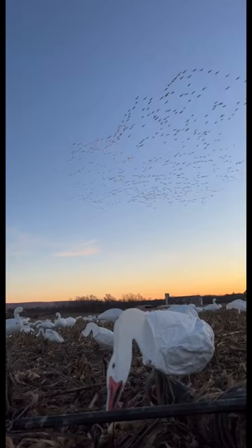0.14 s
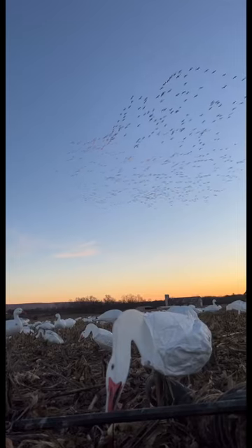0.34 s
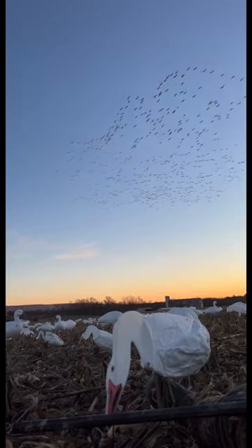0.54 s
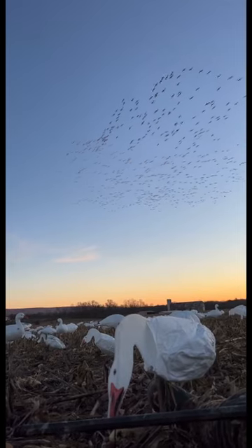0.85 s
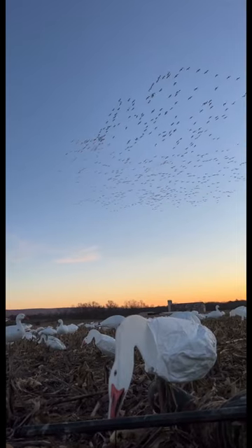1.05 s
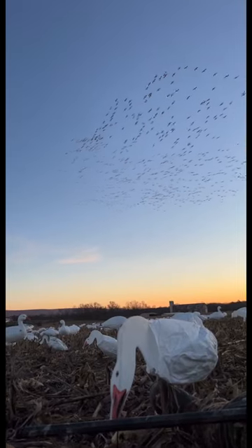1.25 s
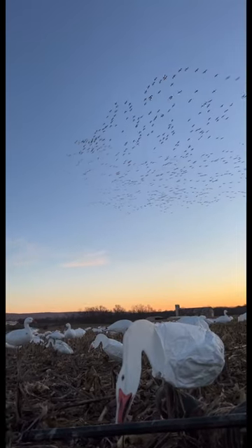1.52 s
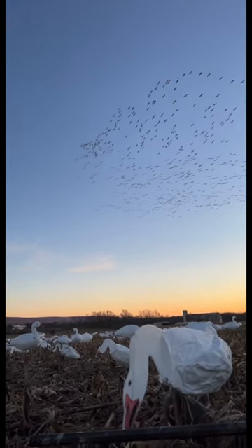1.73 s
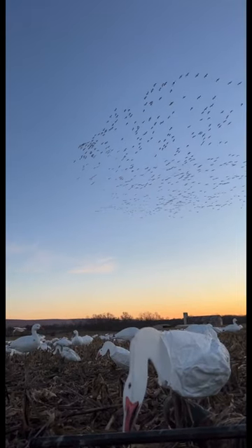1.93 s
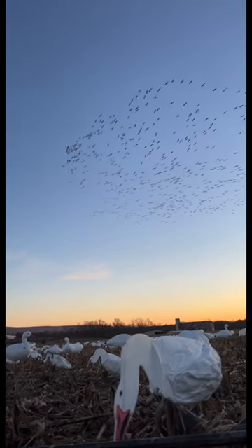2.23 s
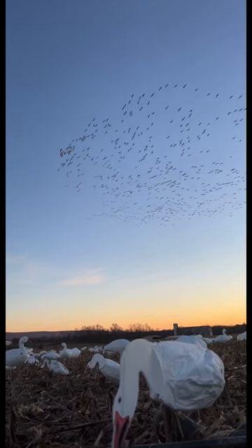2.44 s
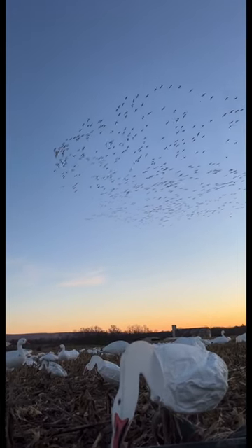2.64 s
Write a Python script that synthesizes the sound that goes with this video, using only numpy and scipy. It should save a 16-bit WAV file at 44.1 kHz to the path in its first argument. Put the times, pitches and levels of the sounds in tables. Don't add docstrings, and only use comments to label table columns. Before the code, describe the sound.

After a tiny silence, a big flock of geese clamours continuously to the end, about 2.8 seconds. Short, raspy, arching honks overlap with dull distant hoots and a blurred crowd. Low grunts thicken between 0.9 and 2 seconds; the clamour surges brightest around 1.6 and 1.9. Wind rumbles low, with soft thumps near 0.3 and 0.8 and a stronger gust near 1.95. Open field, faint echoes.

```python
import sys
import numpy as np
from scipy import signal
from scipy.fft import rfft, irfft
from scipy.io import wavfile
from scipy.ndimage import uniform_filter1d

SR = 44100
rng = np.random.default_rng(int(sys.argv[2]) if len(sys.argv) > 2 else 0)


def wav_out(sig):
    wavfile.write(sys.argv[1], SR, np.round(np.clip(np.atleast_2d(sig).T, -1, 1) * 32767).astype(np.int16))


def invert_db(x):
    u = np.asarray(x, float) / 20
    return 10 ** u


N = 122598

# (rise, fall: share of pitch lost 0.05 s from the crest; level of half-pitch lines, dB)
ARCHED_BEND, LEVEL_BEND, HALVED_BEND = (.075, .07, -28), (.022, .022, -28), (.022, .03, -4)
# frequency_hz, line_level_db
HONK_THROAT = [(850, 2), (1750, -4), (2400, 4), (2850, 5), (3500, -6), (5500, -5), (7500, -1),
               (15500, -28.5)]
# frequency_hz, line_level_db
DULL_THROAT = [(600, -19), (1000, 2), (2000, 8), (3000, -14), (4200, -4), (6000, -54), (15500, -54)]
RASP_DB, AWAY_RASP_DB = -11, -3


def rms_one(x):
    return x / np.sqrt(np.mean(x ** 2) + 1e-20)


def in_time(rows):
    return np.interp(np.arange(N) / SR, *np.transpose(rows))


def at_hz(points, hz):
    points = np.array(points)
    return np.interp(np.log(hz), np.log(points[:, 0]), points[:, 1])


def filtered(x, order, hz, kind):
    return signal.sosfilt(signal.butter(order, hz, kind, fs=SR, output="sos"), x)


def drift(rate_hz, size):
    r = np.exp(-2 * np.pi * rate_hz / SR)
    noise = rng.standard_normal(max(size, 8192) + 4096)
    slow = rms_one(signal.lfilter([1], [1, -2 * r, r * r], noise)[4096:])
    return slow[:size]


def coloured(x, spectrum):
    hz = np.maximum(np.arange(N // 2 + 1) * SR / N, 1)
    return irfft(rfft(x) * invert_db(at_hz(spectrum, hz)), N)


def gusts():
    # time_s, level_db
    strength = [(0.04, -48), (0.43, -36), (0.45, -41.5), (0.59, -35), (0.72, -47), (0.79, -36.5),
                (1.41, -43), (1.46, -32.5), (1.77, -41), (1.95, -26.5), (1.97, -34.5), (2.05, -29.5),
                (2.09, -39), (2.23, -31.5), (2.34, -43), (2.59, -40.5), (2.6, -33), (2.78, -33.5)]
    # frequency_hz, level_db per Hz
    turbulence = [(13, -4), (22, -17.5), (47, 1), (69, 2), (107, -9), (226, -24), (373, -35), (560, -72),
                  (730, -97), (1230, -120)]
    lumps = rng.standard_normal(N) * invert_db(2 * drift(11.3, N))
    low = coloured(lumps, [(5.9, -68), *turbulence, (900, -65)])
    return invert_db(in_time(strength)) * rms_one(low)


def puffs():
    # start_s, peak_db
    buffets = [(0.198, -32), (0.298, -28.5), (0.552, -36), (0.826, -23), (0.977, -39), (1.158, -35.5),
               (1.239, -46), (1.442, -44), (1.643, -41), (1.84, -43), (2.124, -32), (2.581, -33)]
    width_s, low_hz, trim_db = 0.016, 99, -7.5
    t = np.arange(N) / SR
    swell = np.zeros(N)
    for start, db in buffets:
        swell += invert_db(db + trim_db) * np.exp(-((t - start - width_s) / width_s) ** 2)
    return swell * rms_one(filtered(rng.standard_normal(N), 2, [low_hz / 1.025, low_hz * 1.41], "band"))


def wind():
    air = filtered(rng.standard_normal(N), 2, [200, 700], "band")
    return gusts() + puffs() + invert_db(-60.5) * rms_one(air)


def call(out, start, crest, end, pitch_hz, level_db, bend, throat, rasp_db=RASP_DB):
    bend_s, bend_power, attack_s, release_s = .05, 1.6, .018, .028
    jitter, jitter_hz, line_scatter_db = .002, 150, 1.0
    flicker_db, flicker_full_hz, flicker_s = 6.5, 5500, .018
    block = 64

    first = int(start * SR)
    t = np.arange(first, min(int(end * SR), N)) / SR
    rise, fall, half_db = bend
    loss = np.where(t < crest, rise, fall) * (abs(t - crest) / bend_s) ** bend_power
    arch = 1 - np.minimum(loss, .3)
    scatter = rng.standard_normal(128)
    noise = rng.standard_normal(8192)[:len(t)]

    hz = pitch_hz / 2 * arch * (1 + jitter * drift(jitter_hz, len(t)))
    k = np.arange(1, min(int(2 * 15500 / pitch_hz), 38))[:, None]
    if half_db < -20:
        k = k[1::2]

    size = int(flicker_s * SR / block)
    flicker = uniform_filter1d(rng.standard_normal((38, 160)), size, axis=1)
    flicker = rms_one(uniform_filter1d(flicker, size, axis=1))
    gain_db = at_hz(throat, k * hz[::block]) + half_db * (k % 2) + line_scatter_db * scatter[k]
    depth_db = flicker_db * np.minimum(k * pitch_hz / 2 / flicker_full_hz, 1) ** 2
    gain = invert_db(gain_db + depth_db * flicker[:len(k), :gain_db.shape[1]])
    gain = np.repeat(gain, block, axis=1)[:, :len(t)]

    turn = 2 * np.pi * np.cumsum(hz) / SR
    voice = rms_one((gain * np.sin(k * turn + scatter[k + 64])).sum(0))
    voice = voice * (1 + invert_db(rasp_db) * rms_one(uniform_filter1d(noise, size=40)))
    attack = np.clip((t - start) / attack_s, 0, 1)
    release = np.clip((end - t) / release_s, 0, 1)
    out[first:first + len(t)] += invert_db(level_db) * np.sin(np.pi / 2 * attack * release) * voice


def crowd(blur_db, count):
    # frequency_hz, line_level_db
    crowd_throat = [(850, 5), (1700, -1.5), (2500, -6), (3350, -14), (4100, -1.5), (5800, -9), (7500, 5),
                    (15500, -20.5)]
    # frequency_hz, level_db per Hz
    blur_colour = [(600, -7.5), (850, 5), (1700, -6), (2500, -6), (4000, -8.5), (5800, -14.5),
                   (7700, -15.5), (15500, -35)]
    pitch_hz, pitch_spread, call_s, scatter_db = 794.3, .12, .075, 5
    bends = (ARCHED_BEND, LEVEL_BEND, HALVED_BEND)
    out = np.zeros(N)
    for j, (when, size, lean, tune, loud) in enumerate(rng.standard_normal((count, 5))):
        start = max((j + when) / count * N / SR - call_s / 2, 0)
        length = call_s * np.exp(np.clip(.3 * size, -.5, .45))
        if start < N / SR - .02:
            crest = start + length * (.55 + .15 * lean)
            hz = pitch_hz * np.exp(pitch_spread * max(tune, -1))
            call(out, start, crest, start + length, hz, scatter_db * loud, bends[j % 3], crowd_throat)
    blur = rms_one(coloured(rng.standard_normal(N), blur_colour))
    return rms_one(rms_one(out) + invert_db(blur_db) * blur)


def near_crowd(eagerness_db):
    near = crowd(blur_db=-3, count=110)
    treble = filtered(near, 4, [3000, 10000], "band").std()
    return near / treble * invert_db(eagerness_db - 0.5)


def far_crowd(excess_db):
    far = filtered(crowd(blur_db=-8, count=100), 2, 1650, "low")
    return invert_db(-43.5 + 0.21 * excess_db) * rms_one(far)


def grunts(out):
    # start_s, length_s, pitch_hz, level_db
    low_calls = [(0.048, 0.055, 247, -45), (0.163, 0.066, 270, -56), (0.547, 0.083, 346, -46.5),
                 (0.612, 0.042, 329.3, -45), (0.916, 0.057, 245.7, -36), (1.044, 0.041, 334.4, -38),
                 (1.113, 0.11, 327, -43.5), (1.191, 0.053, 248.4, -33.5), (1.303, 0.055, 346.3, -41),
                 (1.414, 0.076, 345.3, -44), (1.561, 0.047, 249.5, -38), (1.608, 0.061, 342.8, -35),
                 (1.719, 0.056, 334, -33), (1.723, 0.0676, 244.4, -38.5), (1.773, 0.079, 266.6, -45.5),
                 (1.898, 0.1, 398, -56), (1.85, 0.062, 340, -38), (1.949, 0.064, 349, -40.5),
                 (2.082, 0.065, 342.5, -40.5), (2.183, 0.082, 321, -42.5), (2.25, 0.036, 278, -37)]
    # frequency_hz, line_level_db
    grunt_throat = [(500, -14), (700, -5), (1000, 0), (1280, 2), (1480, -7), (1750, -22), (3000, -32),
                    (8000, -46)]
    for start, length, hz, db in low_calls:
        crest, end = start + length * 0.552, start + length
        call(out, start, crest, end, hz, db, (.05, .04, -10), grunt_throat, rasp_db=-12)


def hoots(out):
    # start_s, crest_s, end_s, pitch_hz
    hoot_calls = [(.05, .085, .11, 990), (.05, .08, .12, 770), (.15, .165, .24, 860), (.21, .34, .39, 1190),
                  (.395, .42, .445, 1200), (.38, .43, .45, 970), (.55, .61, .70, 850),
                  (.61, .67, .71, 1350), (.74, .75, .84, 1230), (.79, .88, .95, 750), (.96, 1.0, 1.04, 830),
                  (1.045, 1.09, 1.12, 690), (1.10, 1.15, 1.18, 1310), (1.20, 1.23, 1.27, 760),
                  (1.30, 1.34, 1.38, 725), (1.67, 1.75, 1.79, 705), (1.79, 1.85, 1.90, 700),
                  (1.88, 1.95, 2.03, 805), (1.895, 1.92, 1.95, 1150), (2.09, 2.12, 2.16, 985),
                  (2.17, 2.225, 2.25, 1315), (2.29, 2.345, 2.375, 1585), (2.29, 2.32, 2.41, 810),
                  (2.60, 2.66, 2.72, 815), (1.42, 1.47, 1.53, 705)]
    hoot_levels = [-57, -53, -53, -48, -45, -44, -46, -46, -45.5, -46, -43.5, -51, -56, -60, -40, -51,
                   -45.5, -44.5, -40, -53, -50.5, -45, -49, -43.5, -42]
    multiples = np.array([(1, 0), (2, -13), (3, -18), (8, -36)])  # (multiple of the pitch, dB per line)
    for row, db in zip(hoot_calls, hoot_levels):
        call(out, *row, db, (.02, .028, -28), multiples * np.array([row[3], 1]))


def level_honks(out):
    # start_s, crest_s, end_s, pitch_hz
    held_calls = [(.06, .12, .13, 802), (.50, .535, .55, 1203), (.84, .87, .89, 760),
                  (.955, .99, 1.02, 812), (1.55, 1.605, 1.63, 858), (1.63, 1.61, 1.72, 812),
                  (1.92, 1.97, 2.02, 815), (2.52, 2.53, 2.56, 800), (.74, .77, .83, 842),
                  (.925, .95, .975, 800), (1.88, 1.94, 1.97, 813)]
    held_levels = [-45.5, -48.5, -55, -48.5, -34.5, -42.5, -66, -50, -55, -46.5, -43]
    for row, db in zip(held_calls, held_levels):
        call(out, *row, db, LEVEL_BEND, HONK_THROAT)


def arched_honks(out):
    # start_s, crest_s, end_s, pitch_hz
    arched_calls = [(.14, .17, .21, 852), (.23, .31, .37, 912), (.65, .715, .79, 925),
                    (1.11, 1.10, 1.18, 775), (1.50, 1.585, 1.555, 825), (1.84, 1.92, 1.95, 852),
                    (1.94, 1.975, 2.02, 845), (2.075, 2.105, 2.18, 786), (2.52, 2.578, 2.63, 930),
                    (2.66, 2.715, 2.77, 910), (2.45, 2.515, 2.52, 835), (2.615, 2.665, 2.69, 811),
                    (2.26, 2.31, 2.33, 896)]
    arched_levels = [-47.5, -43.5, -39, -43.5, -37.5, -47.5, -60, -49, -38, -45, -44.5, -38, -45.5]
    for row, db in zip(arched_calls, arched_levels):
        call(out, *row, db, ARCHED_BEND, HONK_THROAT)
    call(out, 1.345, 1.405, 1.465, 842, -37, (.033, .125, -28), HONK_THROAT)


def distant_dull_honks(out):
    # start_s, crest_s, end_s, pitch_hz
    away_calls = [(2.655, 2.70, 2.73, 1000), (2.12, 2.18, 2.22, 985), (2.31, 2.39, 2.44, 1095),
                  (2.31, 2.34, 2.45, 1010), (2.11, 2.15, 2.17, 1085), (.94, 1.0, 1.02, 1630),
                  (.95, .97, .99, 1480), (1.07, 1.12, 1.13, 760), (2.33, 2.40, 2.47, 1045),
                  (2.13, 2.20, 2.235, 925), (.18, .235, .27, 1105)]
    away_levels = [-41, -48.5, -49, -47.5, -50.5, -44.5, -46.5, -45.5, -50.5, -49, -49.5]
    for row, db in zip(away_calls, away_levels):
        call(out, *row, db, LEVEL_BEND, DULL_THROAT, AWAY_RASP_DB)
    call(out, .365, .42, .47, 975, -50, (.16, .2, -28), DULL_THROAT, AWAY_RASP_DB)


def halved_honks(out):
    # start_s, crest_s, end_s, pitch_hz
    halved_calls = [
        (.30, .37, .40, 790),
        (.84, .895, .915, 818),
        (1.07, 1.12, 1.14, 814),
        (1.26, 1.28, 1.32, 774),
        (2.28, 2.35, 2.37, 796),
    ]
    halved_levels = [-41, -40.5, -51, -45, -44]
    for row, db in zip(halved_calls, halved_levels):
        call(out, *row, db, HALVED_BEND, HONK_THROAT)


def nasal_cackle(out):
    # frequency_hz, line_level_db
    nasal_throat = [(800, -7), (3100, -17), (3750, -0.5), (4250, -6), (4700, -12), (8000, -17),
                    (15500, -36)]
    call(out, 1.89, 1.982, 2.025, 843, -45, (.036, .125, -1), nasal_throat)


def shared_colour(birds):
    # frequency_hz, gain_db
    path_response = [(2850, 0.5), (3060, -4), (3400, 3), (9000, -8), (10300, -15), (11600, -22.5),
                     (13300, -11.5), (15600, -3)]
    wet = birds.copy()
    for delay_s, db in ((.023, -17.5), (0.06, -22)):
        delay = int(delay_s * SR)
        wet[delay:] += invert_db(db) * birds[:N - delay]
    return filtered(coloured(wet, path_response), 8, 568, "high")


def flock():
    # time_s, level_db
    eagerness = [(.04, -51.5), (.1, -40), (.43, -43), (.5, -51.5), (.58, -40.5), (.77, -39.5), (.83, -49),
                 (.96, -43), (1.09, -50.5), (1.15, -41.5), (1.47, -49), (1.58, -34), (1.68, -37),
                 (1.78, -58.5), (1.88, -36), (1.98, -46.5), (2.07, -57.5), (2.3, -42.5)]
    eager_db = in_time(eagerness)
    excess_db = eager_db - eager_db.mean()
    birds = near_crowd(eager_db) + far_crowd(excess_db)
    for voices in (grunts, hoots, level_honks, arched_honks, distant_dull_honks, halved_honks, nasal_cackle):
        voices(birds)
    sheen = filtered(birds, 2, 6040, "high")
    birds = birds + sheen * (invert_db(0.25 * excess_db) - 1)
    return shared_colour(birds)


def scene():
    return (flock() + wind())[None]


def top_cut(x):
    return signal.sosfilt(signal.butter(12, 15640, fs=SR, output="sos"), x)


def record(dry):
    fade = np.clip((np.arange(N) / SR - 0.035) / 0.0045, 0, 1)
    return top_cut(dry * fade)


dry = scene()
out = record(dry)
wav_out(out)
```